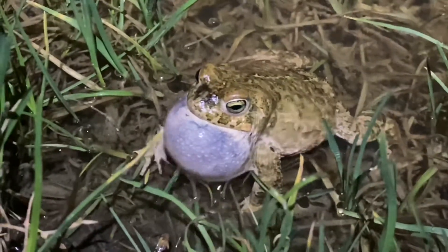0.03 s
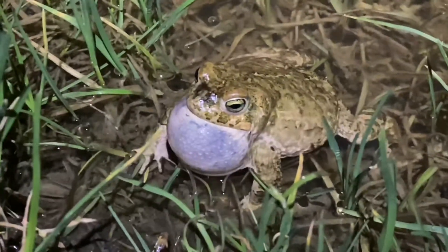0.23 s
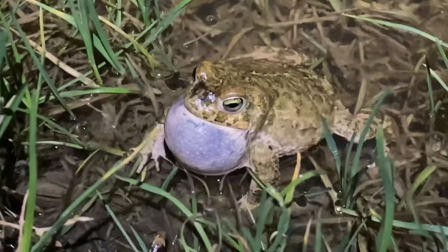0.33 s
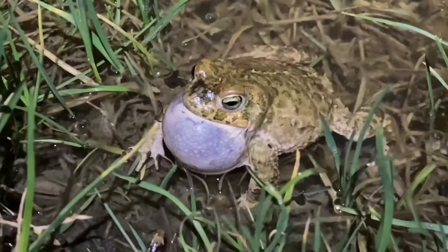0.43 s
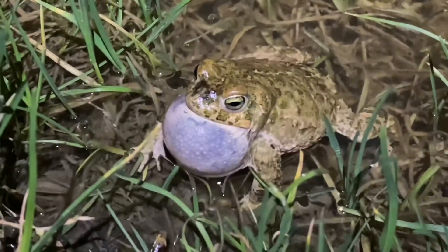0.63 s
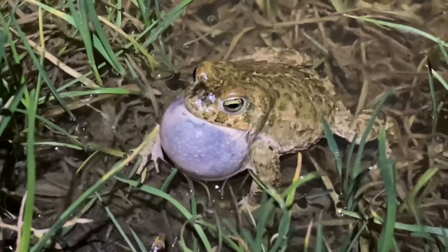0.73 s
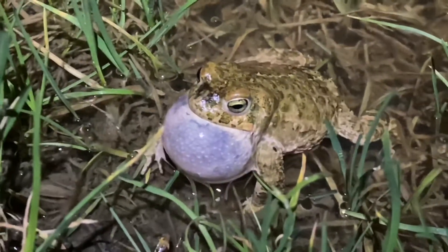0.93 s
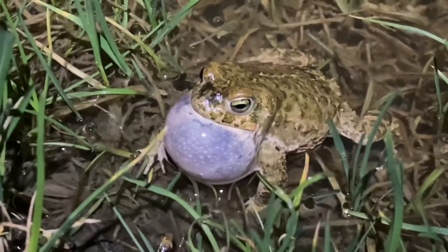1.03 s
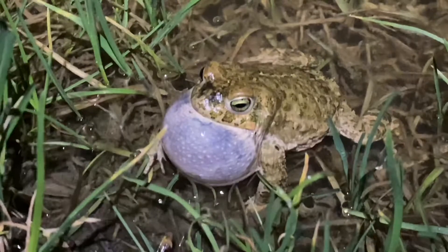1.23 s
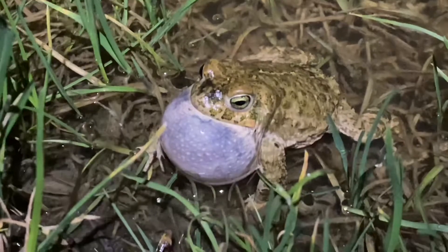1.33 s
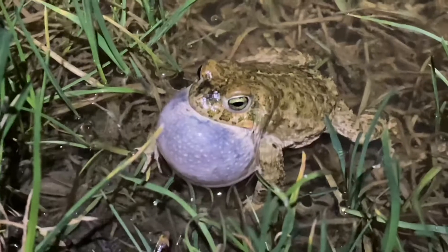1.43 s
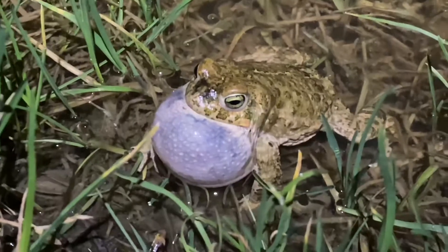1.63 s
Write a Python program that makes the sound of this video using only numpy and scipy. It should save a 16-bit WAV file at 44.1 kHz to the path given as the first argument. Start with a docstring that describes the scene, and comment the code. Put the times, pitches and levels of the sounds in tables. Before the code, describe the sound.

A distant toad pulses softly from 0 to 0.45 s. At 0.21 s a near toad starts with a few spaced knocks, then from 0.4 s trills loudly at roughly thirty hollow, woody pulses per second, pitch rising slightly, with bright clicks and breathy edges. It stops near 1.44 s. The far toad continues faintly with echoes; a tiny whistle passes at 1.58 s over low night rumble, hiss and dim chorus.

```python
"""Toad trill at night

A toad with a swollen vocal sac trills close by: each larynx pulse drives damped resonances of sac, throat and cavity.
As the sac fills its main ring rises and its lowest cavity tone sinks; shaped noise adds a puff of breath.
A second toad, a driven resonance with an upward flick, answers from afar; scattered echoes follow both.
A faint whistle, a gliding sine, passes over filtered noise: low rumble, hiss and a soft distant chorus."""
import sys
import numpy as np
from scipy import signal
from scipy.fft import rfft, irfft, next_fast_len
from scipy.io import wavfile
from scipy.ndimage import map_coordinates

SR = 44100
rng = np.random.default_rng(int(sys.argv[2]) if len(sys.argv) > 2 else 0)


def unload_wav(signal):
    """Save mono or channel-first audio to the path in sys.argv[1] as 16-bit WAV at rate SR, clipped to [-1, 1]."""
    wavfile.write(
        sys.argv[1],
        SR,
        np.round(np.clip(np.atleast_2d(signal).T, -1, 1) * 32767).astype(np.int16),
    )


def field_ratio(decibels):
    """Amplitude ratio for a level in dB (20 dB per decade); scalars and array-likes work."""
    return 10 ** (np.asarray(decibels, dtype=float) / 20)


N = 74970  # length in samples


def unit(x):
    """Normalisation: scale a signal to rms 1."""
    return x / np.sqrt(np.mean(x ** 2) + 1e-20)


def along(points, hz):
    """Logarithmic frequency scale: interpolate (f, value) points on it."""
    f, value = np.transpose(points)
    return np.interp(np.log(hz + 1), np.log(f + 1), value)


def at(rows, s):
    """Linear interpolation in time: every column of a table, read at the times s."""
    times, *columns = np.transpose(rows)
    return [np.interp(s, times, column) for column in columns]


def filtered(x, response):
    """Linear filtering: multiply the spectrum of x by a response of frequency."""
    size = next_fast_len(x.shape[-1] + 8192)
    spectrum = rfft(x, size) * response(np.fft.rfftfreq(size, 1 / SR))
    return irfft(spectrum, size)[..., :x.shape[-1]]


def ring(t, hz, db, t60, push, pan_db=0, lead=0, power=2, phase=0):
    """Damped resonance: driven for push seconds while it decays; db is the envelope's peak between the ears."""
    decay = field_ratio(-60 * t / t60)
    # an exponent under 1 makes every push strongest near its start
    drive = np.sin(np.pi * np.clip(t / push, 0, 1) ** 0.53) ** power
    env = decay * np.cumsum(drive / np.maximum(decay, 1e-9))
    side = np.array([[.5], [-.5]])  # left, right
    level = field_ratio(db + pan_db * side)
    return level * env / env.max() * np.sin(2 * np.pi * hz * t + phase + lead * side)


def add(out, s, make, seconds=.08):
    """Superposition: add make(time since s) into out, with sub-sample timing."""
    i = int(np.ceil(s * SR))
    t = (i + np.arange(int(seconds * SR))) / SR - s
    out[:, i:i + len(t)] += make(t)


def night():
    """Partially correlated noise: rumble and hiss shared between the ears in part, and a blurred far chorus."""
    # spectrum of the night air: f/Hz, relative level per Hz/dB
    night_spectrum = [(15, -44), (32, -19), (59, -1.5), (135, -6.5), (236, -12), (634, -19.5), (950, -29.5),
                      (1600, -32.5), (2600, -45), (4200, -57), (9000, -65), (16000, -64)]
    # likeness of the two ears: f/Hz, left-right correlation
    likeness = [(30, .87), (60, .93), (130, .91), (290, .78), (640, .4), (1500, .3), (12000, .1)]
    night_db, chorus_db, swell_db = -63.5, -76, 5  # rms level, middle level, spread of the swell
    chorus_hz, chorus_width_hz = 1230, 150  # centre; distance to half amplitude

    def mid_side_response(f):
        turn = np.arccos(np.clip(along(likeness, f), -1, 1)) / 2
        return field_ratio(along(night_spectrum, f)) * [np.cos(turn), np.sin(turn)]

    mid, side = filtered(rng.standard_normal((2, N)), mid_side_response)
    air = unit(np.array([mid + side, mid - side]))
    chorus = filtered(rng.standard_normal((2, N)), lambda f: 1 / (1 + ((f - chorus_hz) / chorus_width_hz) ** 4))
    swell = map_coordinates(rng.standard_normal(60), [np.arange(N) * 30 / SR])  # 30 random points per second
    return field_ratio(night_db) * air + field_ratio(chorus_db + swell_db * swell) * unit(chorus)


def whistle():
    """Frequency modulation: one faint gliding sine, its phase the integral of its frequency."""
    # path of the whistle: t/s, f/Hz, rms level/dB
    glide = [(1.548, 3015, -95), (1.558, 3030, -82), (1.575, 3110, -89), (1.59, 3030, -73.5),
             (1.6, 2920, -89), (1.606, 2910, -88)]
    t = np.arange(N) / SR
    hz, db = at(glide, t)
    on = (t > glide[0][0]) & (t < glide[-1][0])
    return np.sqrt(2) * on * field_ratio(db) * np.sin(2 * np.pi * np.cumsum(hz) / SR)


def echo(x):
    """Diffuse scattering: banks and reeds answer with decaying noise, independent in each ear."""
    delay_s, t60_s = .01, .085
    t = np.arange(SR // 4) / SR
    tail = rng.standard_normal((2, len(t))) * field_ratio(-60 * t / t60_s)
    tail = tail / np.linalg.norm(tail[0])
    tail = np.pad(tail, ((0, 0), (int(delay_s * SR), 0)))
    return signal.fftconvolve(x, tail, axes=1)[:, :N]


def far_toad():
    """Pulse-driven resonance: a longer push than the near toad's, each opened by a quick upward flick."""
    # pulses of the far toad: t/s, peak level/dB
    far_pulses = [(0.0263, -46), (0.0593, -43.5), (0.0982, -43), (0.1406, -43), (1.4716, -44),
                  (1.5184, -43), (1.5673, -42.5), (1.6287, -42.5), (1.6846, -41), (.191, -43),
                  (.233, -37.5), (.286, -41), (.353, -40.5), (.4, -38), (.444, -34.5), (.633, -36),
                  (.675, -40.5), (.723, -41), (1.423, -46)]
    early_s = .0018  # each ring starts this long before its listed time
    flick_hz, flick_hz_per_s, flick_db = 1450, 230000, -27  # start, glide, middle level re pulse
    out = np.zeros((2, N + SR))

    def pulse(t, db):
        body_hz = 1208 + 8 * rng.standard_normal()
        body = ring(t, body_hz, db, t60=.03, push=.0065, pan_db=.6, lead=1.5)
        level = db + flick_db + 2.5 * rng.standard_normal()
        glide = np.pi * flick_hz_per_s * t ** 2
        flick = ring(t, flick_hz, level, t60=.02, push=.0018, phase=glide)
        fade = np.clip((.0065 - t) / .002, 0, 1)
        return body + fade * flick

    for s, db in far_pulses:
        add(out, s - early_s, lambda t: pulse(t, db))
    return out[:, :N]


def sac_ring(t, s, db):
    """Resonance of the sac: the main ring and its octave start sharp and settle."""
    # the sac as it fills: t/s, settled main ring f/Hz, main ring T60/s, lowest cavity tone f/Hz
    filling = [(.21, 1207, 0.023, 7620), (.45, 1251, 0.028, 7520), (.66, 1271, 0.026, 7350),
               (.98, 1290, 0.03, 6815), (1.24, 1308, 0.024, 6570), (1.44, 1298, 0.02, 6380)]
    hz, t60, low_hz = at(filling, s)
    chirp_hz, chirp_s = 220, 0.00059  # sharpness at the start, time constant of settling
    bend = 2 * np.pi * chirp_hz * chirp_s * (1 - np.exp(-t / chirp_s))
    main = -ring(t, hz, db, t60, push=.0039, pan_db=2.6, lead=.41, power=1, phase=bend)
    octave = ring(t, 2 * hz, db - 31, t60=.011, push=.0039, lead=.5, power=1, phase=2 * bend)
    return main + octave, low_hz


def throat_rings(t, db):
    """Modal superposition: short rings of throat and head, scattered a little at each pulse."""
    # modes: middle f/Hz, middle level re pulse/dB, T60/s, left over right/dB, left phase lead/rad, polarity
    modes = [(500, -43, .016, 1.6, .3, 1), (705, -37, .028, 1.9, .3, -1), (1750, -36, .01, 1.1, .05, 1),
             (2150, -36, .014, .4, .1, -1), (2400, -37, .01, .1, .3, 1), (2900, -34, .024, .1, .6, 1),
             (3150, -35, .013, .1, .65, -1), (3480, -43, .012, .1, .65, 1), (3750, -44, .013, .1, .6, -1),
             (5150, -61, .018, .1, .2, 1), (11650, -67, .016, .1, -.6, 1)]
    scatter_db, detune = 1.4, .007  # standard deviations; detune is a fraction of frequency
    out = 0
    for hz, gain, t60, pan, lead, sign in modes:
        size, tune = rng.standard_normal(2)
        level = db + gain + scatter_db * size
        out = out + sign * ring(t, hz * (1 + detune * tune), level, t60, push=.002, pan_db=pan, lead=lead)
    return out


def cavity_tones(t, s, db, low_hz):
    """Cavity resonance: thin tones keep their ratios to the lowest, each with its own course of level."""
    # tones: multiple of the lowest, T60/s, left phase lead/rad
    tones = [(1, .036, .05), (1.165, .034, .05), (1.765, .024, -1.6), (1.9, .022, 2.3), (2.13, .024, 2.3)]
    # course of each tone: t/s, then middle level re pulse/dB for each of the five
    tone_levels = [(0.212, -53.5, -91.5, -82, -81, -77.5), (0.479, -51.5, -91, -75, -52, -90),
                   (0.601, -51, -92, -63, -55, -89.5), (.75, -62.5, -82, -59, -70.5, -77.5),
                   (0.952, -54.5, -65.5, -63.5, -76.5, -57), (1.15, -58.5, -54.5, -57.5, -80.5, -56),
                   (1.25, -52, -54.5, -54.5, -76.5, -56), (1.34, -46.5, -57, -66, -80.5, -68),
                   (1.44, -51, -58.5, -76, -84, -79)]
    out = 0
    for (multiple, t60, lead), gain in zip(tones, at(tone_levels, s)):
        level = db + gain + 1.5 * rng.standard_normal()
        out = out + ring(t, multiple * low_hz, level, t60, push=.0035, lead=lead)
    return out


def breath():
    """Shaped turbulence noise: steady breath of rms 1, mostly common to both ears."""
    # spectrum of the breath: f/Hz, relative level/dB
    breath_spectrum = [(200, -4), (1500, -16), (3500, -6.5), (4300, -7.5), (7000, -13), (10000, -14),
                       (12500, -25), (15300, -21), (17000, -60)]
    common, *each = rng.standard_normal((3, N))
    return unit(filtered(common + 0.43 * np.array(each), lambda f: field_ratio(along(breath_spectrum, f))))


def puff(t, db):
    """Amplitude modulation: the envelope of the breath at each opening, a soft rise and a decay."""
    breath_db, t60_s, rise_s = -45.5, 0.034, 0.0024  # level re pulse before the rise and decay
    return field_ratio(db + breath_db - 60 * t / t60_s) * (1 - np.exp(-t / rise_s)) ** 2


def near_toad():
    """Source and resonators: each larynx pulse rings sac, throat and cavity and lets out a puff of breath."""
    # larynx pulses of the near toad: t/s, peak level of the main ring/dB
    larynx_pulses = [(0.2104, -13), (0.258, -10.5), (0.3773, -10.5), (0.4152, -8.5), (0.4538, -7.5),
                     (0.4802, -6), (0.5056, -5.5), (0.5336, -6), (0.5661, -6.5), (0.603, -8),
                     (0.6549, -7.5), (0.692, -7), (0.7349, -6.5), (0.7642, -5), (0.7922, -5.5),
                     (0.8241, -5.5), (0.853, -5), (0.8813, -5.5), (0.9145, -6), (0.9452, -5.5),
                     (0.9769, -6), (1.0154, -6), (1.047, -5.5), (1.0818, -6), (1.1178, -5), (1.1454, -4.5),
                     (1.1761, -5), (1.209, -4.5), (1.2347, -4), (1.2624, -6), (1.291, -5.5), (1.313, -4.5),
                     (1.3354, -5), (1.3584, -6), (1.3872, -6.5), (1.4338, -12)]
    lead_s = .0008  # each ring starts this long before its listed time
    out, puffs = np.zeros((2, N + SR)), np.zeros((2, N + SR))

    def pulse(t, s, db):
        sac, low_hz = sac_ring(t, s, db)
        return sac + throat_rings(t, db) + cavity_tones(t, s, db, low_hz)

    for s, db in larynx_pulses:
        add(out, s - lead_s, lambda t: pulse(t, s, db))
        add(puffs, s - lead_s, lambda t: puff(t, db))
    return out[:, :N] + puffs[:, :N] * breath()


def scene():
    """Superposition: both toads with their echoes, the whistle and the night."""
    near, far = near_toad(), far_toad()
    echoes = echo(field_ratio(-42) * near + field_ratio(-7) * far)
    return near + far + echoes + whistle() + night()


def top_cut(x):
    """Nothing passes above the cut-off."""
    return signal.sosfilt(signal.butter(12, 16480, fs=SR, output="sos"), x)


def record(dry):
    """Two-channel transmission: hand on the finished stereo mix."""
    return top_cut(dry)


dry = scene()
out = record(dry)
unload_wav(out)
```